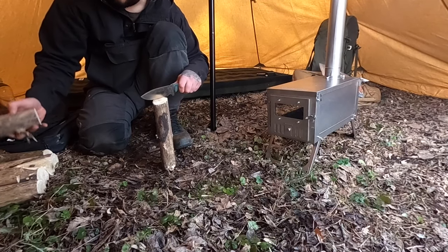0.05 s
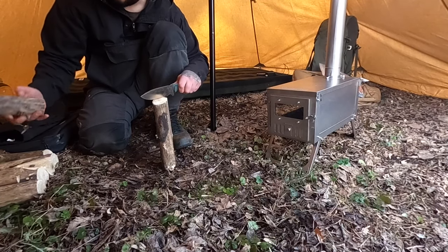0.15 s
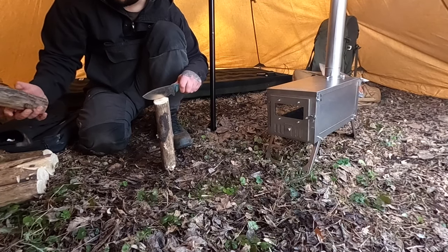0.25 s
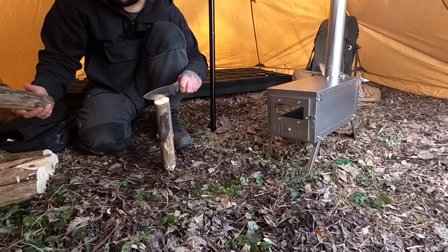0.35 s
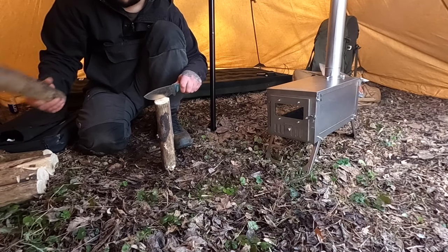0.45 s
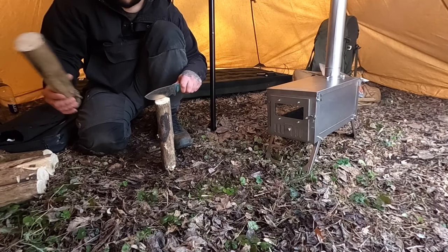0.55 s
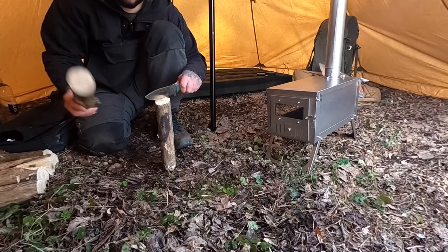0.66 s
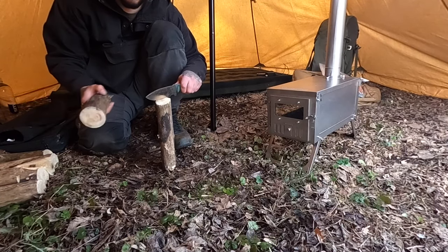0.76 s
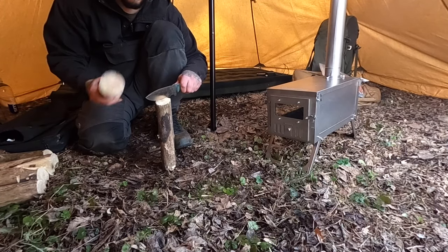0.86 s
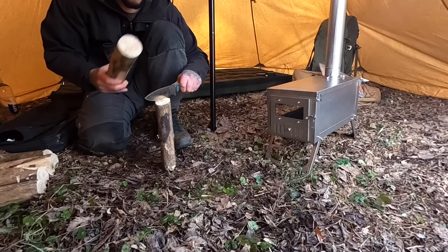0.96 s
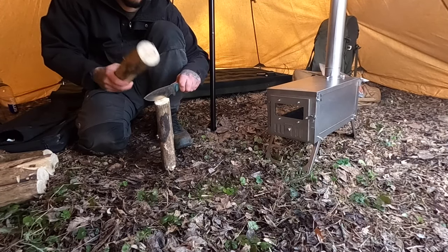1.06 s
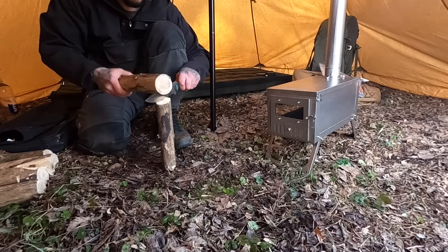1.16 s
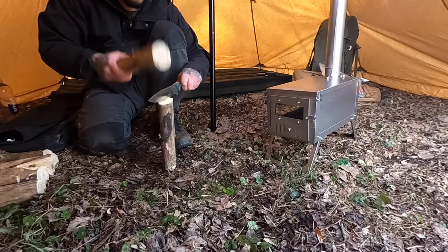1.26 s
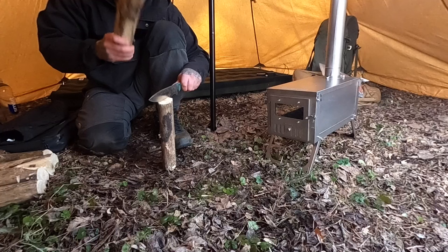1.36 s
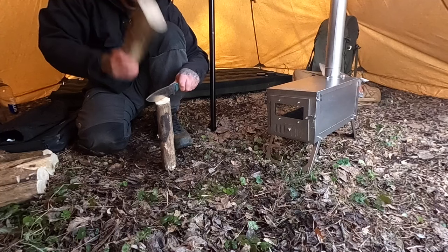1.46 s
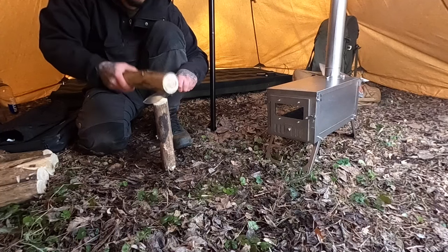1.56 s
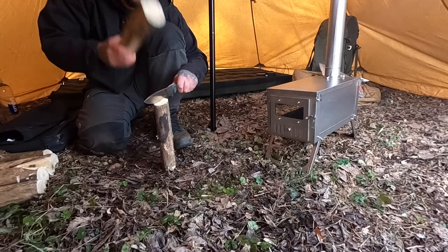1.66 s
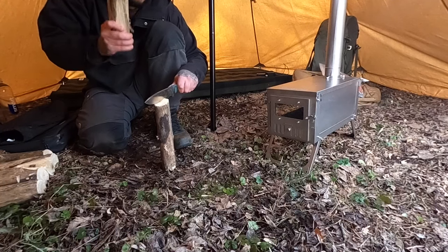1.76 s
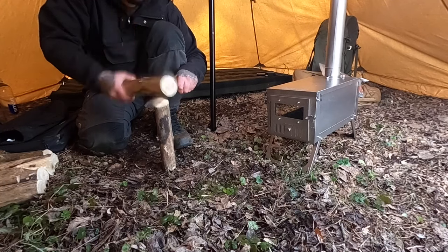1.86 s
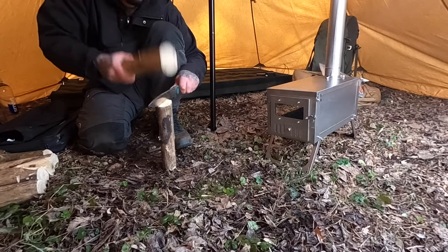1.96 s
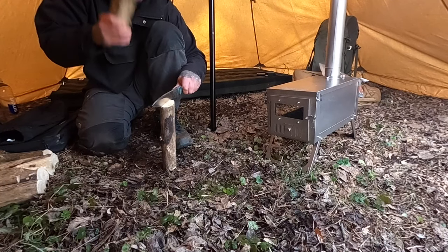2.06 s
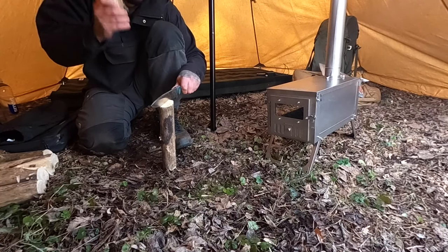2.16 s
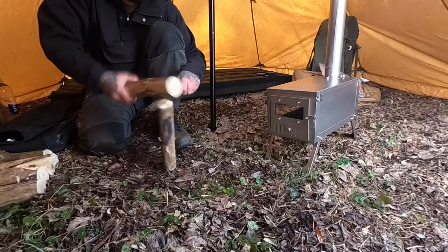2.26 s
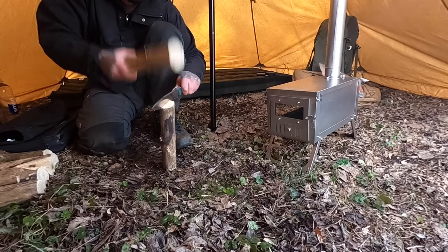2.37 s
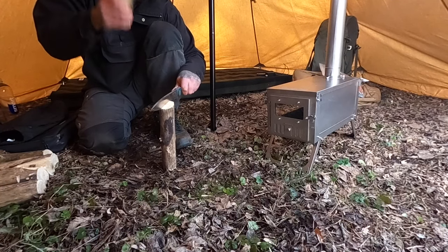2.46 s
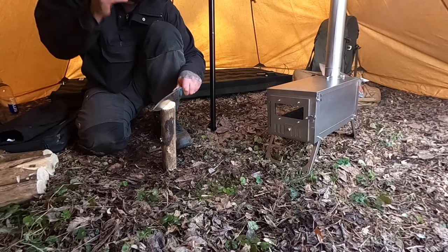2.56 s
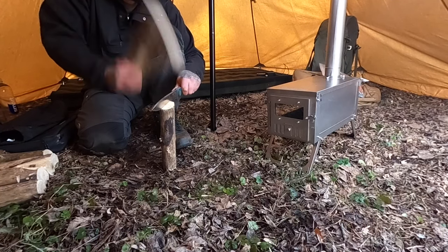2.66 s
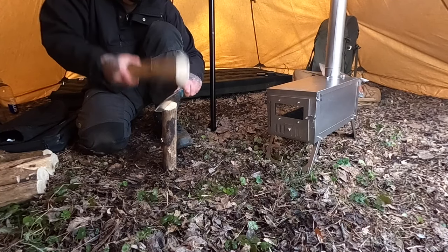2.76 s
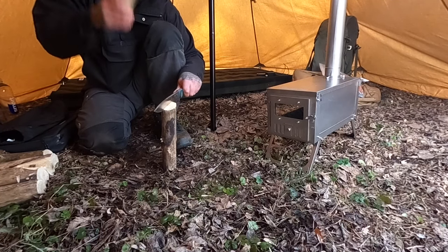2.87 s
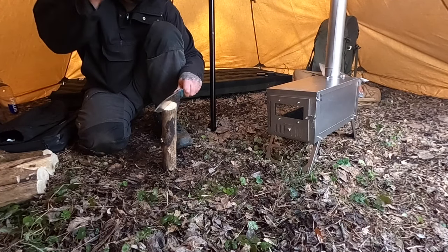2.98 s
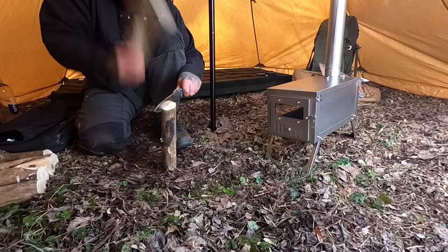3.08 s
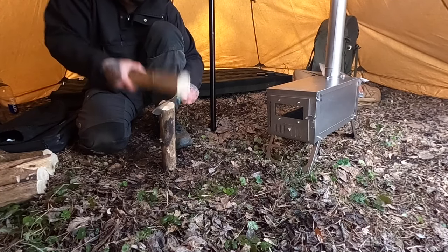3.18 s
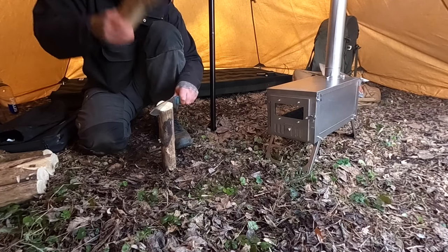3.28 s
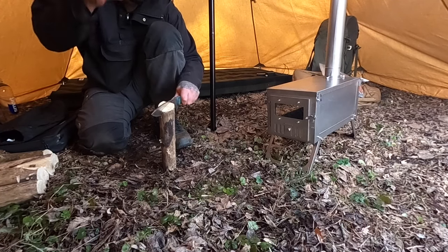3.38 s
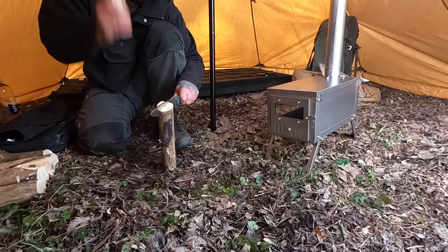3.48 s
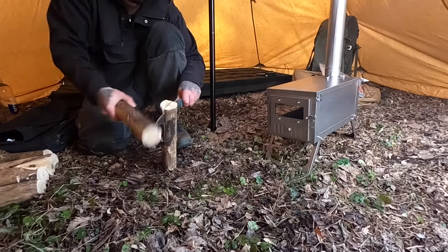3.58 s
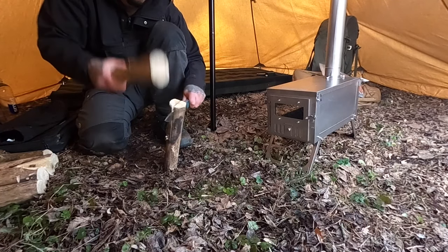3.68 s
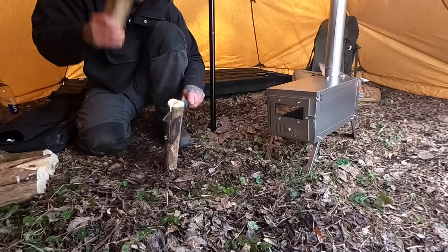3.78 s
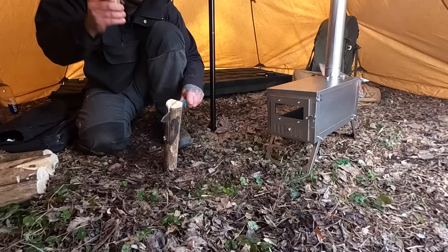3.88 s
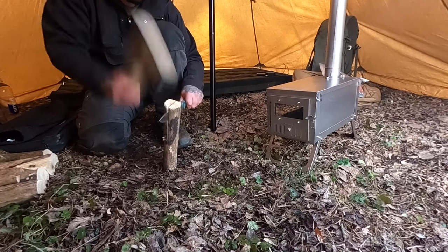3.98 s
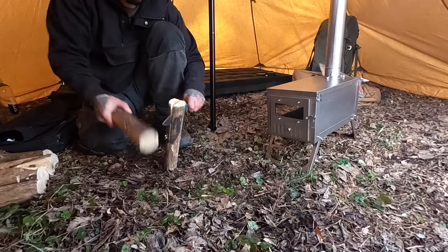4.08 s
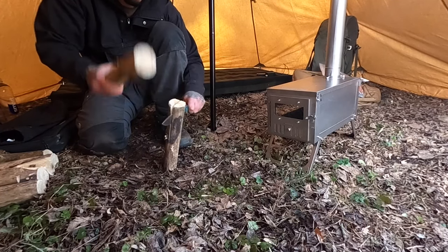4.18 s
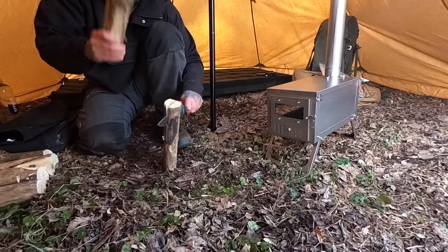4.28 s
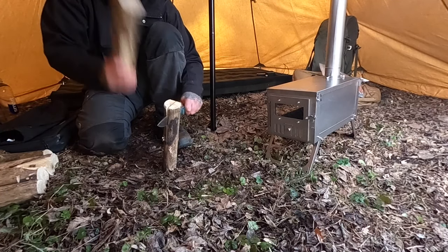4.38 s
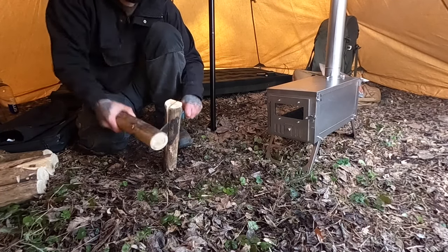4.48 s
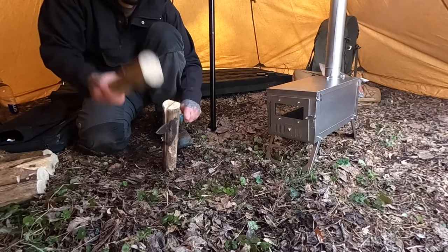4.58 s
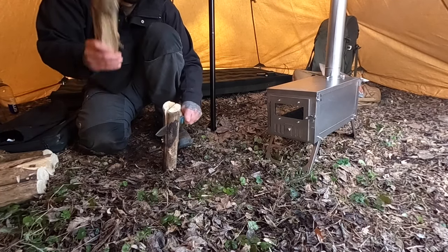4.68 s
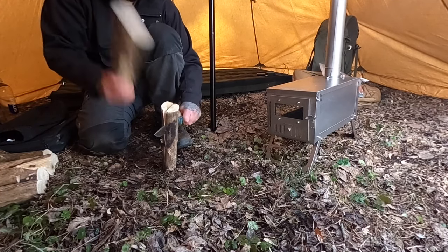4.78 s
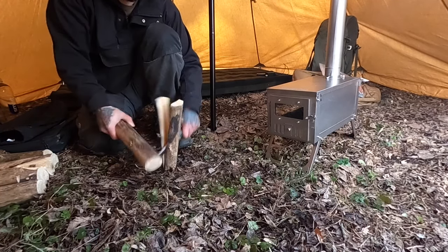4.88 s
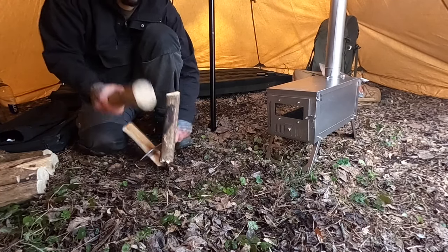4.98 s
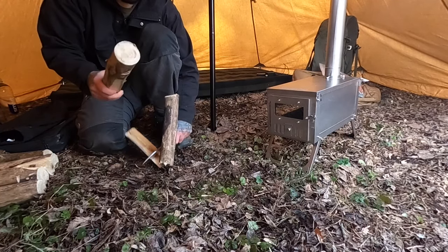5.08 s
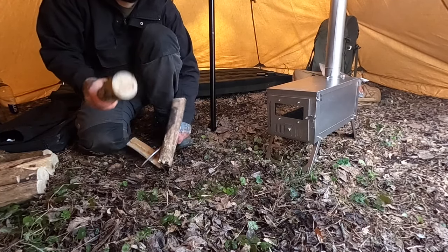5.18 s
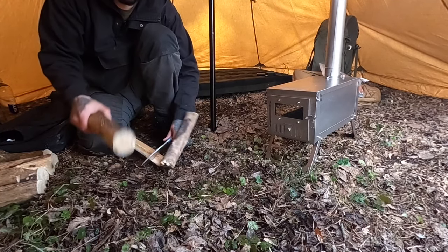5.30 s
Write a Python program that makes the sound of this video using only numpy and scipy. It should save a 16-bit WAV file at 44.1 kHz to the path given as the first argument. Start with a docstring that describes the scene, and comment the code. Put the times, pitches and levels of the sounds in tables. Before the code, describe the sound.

Close stereo microphones in a canvas tent on leafy ground. Very faint blade scrapes and ticks on wood come first, then a softer knock and nine loud, dry baton blows on a knife in a log, about 0.4 seconds apart. At the last blow the wood fibres crackle apart and a half falls into dead leaves. A low steady rumble lies beneath.

```python
"""In a tent on the forest floor, a wooden baton drives a knife down through a small log: ten dry knocks.
Each blow is one crushed push, filtered by modes of wood, blade and ground; shaped noise adds canvas and trees.
After the last blow fibres tear as noisy snaps, and one half topples, crunching clustered clicks into dead leaves.
Earlier the edge scrapes, ticks and squeaks; a jacket swishes; a low rumble and a far hush lie under everything."""
import sys
import numpy as np
from scipy import signal
from scipy.fft import rfft, irfft, dct, next_fast_len
from scipy.io import wavfile
from scipy.ndimage import map_coordinates

SR = 44100
rng = np.random.default_rng(int(sys.argv[2]) if len(sys.argv) > 2 else 0)


def store_pcm(level_fs):
    """Save levels as 16-bit WAV."""
    pcm = np.round(np.clip(level_fs, -1, 1) * 32767).astype(np.int16)
    wavfile.write(sys.argv[1], SR, np.atleast_2d(pcm).T)


N = 235610
RING = np.arange(SR // 4) / SR  # time axis of one short sound [s]

# Background, before the bed trims: (time [s], rumble level [dB], far hush level [dB])
BED_LEVELS = [(0.1, -34.5, -56), (1.24, -39.5, -62), (1.84, -38.5, -60.5), (2.07, -41.5, -61),
              (3.08, -39.5, -62), (4.36, -39, -62.5), (4.46, -36.5, -60.5), (5.3, -39, -60.5)]
# Relative spectra of the low rumble and the far hush: (frequency [Hz], level [dB])
RUMBLE_SPECTRUM = [(21, -31.5), (36, -8.5), (70, -1.5), (86, 2.5), (98, -10), (124, -7.5), (157, -9.5),
                   (276, -29.5), (344, -36.5), (377, -52), (400, -41), (520, -70.5), (880, -120)]
HUSH_SPECTRUM = [(200, 1), (450, -5), (650, -6), (950, -0.5), (1400, -3.5), (2000, -13), (2800, -28),
                 (5000, -29.5), (8000, -39.5), (11000, -53)]
# A narrow drone swells out of the rumble: middle of the swell [s], time constant [s], level reached [dB]
DRONE_S, DRONE_SWELL_S, DRONE_DB = 3.64, 0.18, -39

# The edge shifts on the end grain while the blow is lined up: (time [s], length [s], level [dB])
SCRAPES = [(.22, 0.12, -75), (.41, 0.06, -75.5), (.49, 0.091, -77), (.63, 0.035, -85), (.735, 0.056, -71.5)]
# Light touches of the blade on the log: (time [s], starting level [dB])
TOUCHES = [(0.25, -64.5), (0.455, -63), (.777, -66)]
# Relative spectrum of the edge on wood: (frequency [Hz], level [dB])
EDGE_SPECTRUM = [(1500, -3.5), (3600, -2.5), (4200, 3.5), (4800, -4.5), (6500, -5), (8000, -14),
                 (11000, -16), (15000, -34)]
# The steel squeaks faintly in the end grain: (time [s], half length [s], frequency [Hz], level [dB])
SQUEAKS = [(0.31, 0.013, 4100, -71), (0.58, 0.019, 2100, -69), (0.629, 0.011, 2055, -57)]

# Baton blows, the last row being the baton following through; levels are before the knock trim:
# (time [s], level [dB], ground thud lift [dB], hardness [dB per octave], favoured region [Hz], its lift [dB],
#  weight [dB], wood ring lift [dB], crack [dB], blade frequency [Hz], blade ring [dB])
BLOWS = [(1.207, -14, -14, -1.5, 360.0, 8, -3, 2.5, -2.0, 4140, 2),
         (1.5812, -1.5, -12.5, -1.0, 1130.0, 5, -5.5, -1, 2.0, 4240, 9),
         (1.9386, -1.5, -1.5, -1.5, 1200.0, 9, -10.5, -1, 2.0, 4180, 14.5),
         (2.3381, -0.5, 1, 0.0, 1350.0, 4, 1.5, 2, -1.5, 5340, 14),
         (2.7581, -2, -2, -2, 1300.0, 3, 0.5, 2.5, 16.5, 5220, 6),
         (3.1848, -1, -2.5, -1, 370.0, 4, 3.5, 2.5, 5, 4280, -2),
         (3.6258, -1.5, -6.5, -1.5, 1580.0, 6, 7.5, -1, 6.5, 4290, 5.5),
         (4.0815, -4, 12.5, 4, 2110.0, 3.5, 2.5, 2.5, -14.5, 4350.0, 4.5),
         (4.5061, -1, -1.5, 2, 1330.0, 1, 9.5, 2, -10.5, 5240, 2.5),
         (4.8941, -3.5, 11, 1.0, 1380.0, 8, -8, -4.5, 1.5, 5840, 3.0),
         (4.9179, -9.5, 4, 1.0, 940.0, 5, 5, 3.5, -7.5, 4340, 5)]
# Bare contact before any resonance: (frequency [Hz], level [dB])
CONTACT_SPECTRUM = [(15, -21.5), (40.0, 30.5), (130.0, 20.5), (330.0, 24), (560.0, 21.5), (900.0, 17.5),
                    (1450.0, 20.0), (2100.0, 13.5), (2850.0, 2.5), (4000.0, 1.5), (5800.0, 2.0),
                    (8000.0, -7), (10500.0, -13.0), (13000.0, -26.5), (15500.0, -39)]
# Modes of log and baton, of the soft ground, and a second one of the blade. Before each blow's lifts and
# slight detuning and the cap on cycles: (frequency [Hz], height over the contact curve [dB], t60 [s])
WOOD_MODES = [(444, 2.5, 0.026), (688.4, 6.5, 0.032), (780.6, 7.5, 0.04), (1003, 0.5, 0.024),
              (1230, 0.5, 0.025), (1704, 0.5, 0.099)]
GROUND_MODES = [(61, 5.0, 0.15), (147, 14.5, 0.073)]
UPPER_BLADE_MODE = (10000, 1, 0.0067)
BLADE_T60 = 0.021  # main blade mode before the cap on cycles [s]
RING_CYCLES = 62  # gripped by hand and log, nothing in a knock rings for more cycles than this
# Where the baton lands favours a region of the wood: half width [octaves]; centre of the knock's weight [Hz]
HUMP_OCTAVES, WEIGHT_HZ = 0.22, 234
PIVOT_HZ = 910  # a harder blow gains above this pitch and loses below it
CRACK_HZ = 5000  # the crack is the treble above this
LEAD_S = 0.01  # a faint copy runs this far ahead of each knock [s]
# Scatter from canvas, stove and ground: (frequency [Hz], level against the direct knock [dB])
SCATTER = [(150, -16.5), (600, -8), (1100, -5), (2100, -2.5), (4000, -3.5), (8000, -11.5)]
# Answer of the trees: (frequency [Hz], relative level [dB]) and (frequency [Hz], t60 [s])
TREES_SPECTRUM = [(100, 8), (400, -5), (1000, 1), (1700, -10), (2800, -24.5), (4200, -24.5), (7000, -28.5),
                  (14000, -50.5)]
TREES_T60 = [(200, 0.52), (1000, 0.51), (4000, 0.38), (12000, 0.17)]

# Jacket sleeve: (time [s], length [s], level [dB])
SWISHES = [(3.998, 0.01, -54.5), (4.05, 0.078, -58.5), (4.54, 0.044, -60.5)]
# Relative spectrum of cloth on cloth: (frequency [Hz], level [dB])
CLOTH_SPECTRUM = [(500, -26), (1000, 4.5), (1600, 4), (2800, -15.5), (4300, -7), (7000, -19),
                  (10500, -17.5), (15000, -41.5)]

# Fibres snapping: (time [s], level [dB])
SNAPS = [(4.346, -60.5), (4.9372, -29.5), (4.952, -37.5), (4.962, -37.5), (4.975, -37), (4.9978, -41.5)]
# Relative spectrum of breaking fibres: (frequency [Hz], level [dB])
SPLINTER_SPECTRUM = [(200, 3), (700, -1.5), (1600, 4.5), (2600, -4.5), (4200, -1.5), (7000, -14.5),
                     (10500, -23), (15000, -39)]
# Loose half, before its random spread: (frequency [Hz], relative strength [dB], t60 [s])
LOOSE_HALF_MODES = [(1330, 16, 0.042), (1707, 12.5, 0.029), (1754, 17, 0.077), (2540, 6.5, 0.027),
                    (3670, -3, 0.03)]
# Dead leaves crushed by the falling wood: (time [s], length [s], level [dB])
LITTER = [(5.115, 0.026, -63.5), (5.19, 0.042, -48.5), (5.338, .02, -59)]
# Relative spectrum of crushed leaves: (frequency [Hz], level [dB])
LEAVES_SPECTRUM = [(300, -20), (900, -1.5), (1700, 5.5), (2800, -3.5), (4300, -5.5), (6500, -22.5),
                   (11000, -35.5), (15000, -54)]
# The split half strikes the ground and settles: (time [s], level [dB])
LANDINGS = [(5.0594, -33), (5.1636, -48.5), (5.1899, -42.5), (5.21, -49), (5.2228, -44), (5.232, -47)]

# Diffuse sound: (frequency [Hz], left-right likeness [0 to 1])
LIKENESS = [(330, 1), (700, .995), (1300, .92), (2400, .76), (4400, .43), (8000, .35)]
# Knocks at the two microphones: (frequency [Hz], left minus right [dB])
# and (frequency [Hz], phase by which left leads [rad])
LEVEL_LEAN = [(1050, 0), (1650, .7), (2100, 3.2), (3300, 2.6), (4200, .8), (7000, -.5), (8500, .7),
              (11500, -1)]
PHASE_LEAD = [(1000, 0), (3000, -.1), (3600, -.42), (4300, -.08), (6000, .12), (8200, .38), (9700, -.2),
              (13000, 0)]
TOP_HZ = 15600  # band limit of the recorder


def amp(db):
    """Decibels to gain."""
    return 10 ** (np.asarray(db) / 20)


def unit(x):
    """Scale to rms 1."""
    return x / np.sqrt(np.mean(x ** 2) + 1e-20)


def packet(x):
    """Scale to energy 1 per channel."""
    return unit(x) / np.sqrt(x.shape[-1])


def along(points, hz):
    """Read (frequency, value) points on a log axis."""
    f, v = np.transpose(points)
    return np.interp(np.log(hz + 1), np.log(f + 1), v)


def curves(rows):
    """One value per sample for each column after the time."""
    s, *cols = np.transpose(rows)
    return [np.interp(np.arange(N) / SR, s, c) for c in cols]


def add(track, s, sound):
    """Mix a sound into the track at time s."""
    part = track[:, round(s * SR):][:, :sound.shape[-1]]
    part += sound[..., :part.shape[1]]


def colour(x, points):
    """Causal minimum-phase filter with the gain of (Hz, dB) points, built by folding the cepstrum."""
    n = x.shape[-1]
    m = 2 * next_fast_len(n // 2 + 4096)
    log_gain = np.log(amp(along(points, np.fft.rfftfreq(m, 1 / SR))))
    cepstrum = irfft(log_gain)
    cepstrum[1:m // 2] *= 2
    cepstrum[m // 2 + 1:] = 0
    response = np.exp(rfft(cepstrum))
    return irfft(rfft(x, m) * response, m)[..., :n]


def stereo(pair):
    """Two unrelated signals as diffuse sound at close microphones: alike in the bass, apart in the treble."""
    n = pair.shape[-1]
    likeness = along(LIKENESS, np.fft.rfftfreq(n, 1 / SR))
    turn = np.arccos(np.clip(likeness, -1, 1)) / 2
    mid, side = irfft(rfft(pair) * [np.cos(turn), np.sin(turn)], n)
    return np.array([mid + side, mid - side])


def rush(spectrum):
    """Diffuse noise of rms 1."""
    return unit(colour(stereo(rng.standard_normal((2, N))), spectrum))


def crackle(size, spread_db, width, apart_hz=2400):
    """Dense tiny clicks of very uneven size; the two microphones differ only in the treble."""
    sizes_db = spread_db * np.clip(rng.standard_normal(size), -2, 2)
    clicks = unit(rng.standard_normal(size) * amp(sizes_db))
    treble = signal.butter(3, apart_hz, "high", fs=SR, output="sos")
    side = width * signal.sosfilt(treble, rng.standard_normal(size))
    return np.array([clicks + side, clicks - side])


def clumps(size, depth_db, per_s=330):
    """A jagged gain that gathers tiny clicks into bunches."""
    knots = np.clip(rng.standard_normal(size), -2, 2)
    jagged = np.interp(np.arange(size) * per_s / SR, np.arange(size), knots)
    return unit(amp(depth_db * jagged))


def strokes(rows, attack_s, release_s):
    """Gain of rubbing movements: each rises by 60 dB in attack_s, holds for its length, falls 60 dB in release_s."""
    t = np.arange(N) / SR
    gain = np.zeros(N)
    for s, length, db in rows:
        away = np.maximum((s - t) / attack_s, (t - s - length) / release_s)
        gain += amp(db - 60 * np.maximum(0, away))
    return gain


def outdoors(rumble_trim_db=1.34, hush_trim_db=2.0, drone_hz=83):
    """A low rumble, an unsteady drone and a soft hush, like far traffic, all from diffuse filtered noise."""
    rumble_db, hush_db = curves(BED_LEVELS)
    rumble = amp(rumble_db + rumble_trim_db) * rush(RUMBLE_SPECTRUM)
    drone = rush([(drone_hz * 0.75, -45), (drone_hz, 0), (drone_hz * 1.3, -45), (600, -120)])
    swell = (1 + np.tanh((np.arange(N) / SR - DRONE_S) / DRONE_SWELL_S)) / 2
    hush = amp(hush_db + hush_trim_db) * rush(HUSH_SPECTRUM)
    return rumble + amp(DRONE_DB) * swell * drone + hush


def scrapes():
    """The edge drags over the end grain: bunched grit under slow strokes."""
    grit = crackle(size=N, spread_db=6.0, width=0.8) * clumps(size=N, depth_db=3.5, per_s=120)
    return strokes(SCRAPES, attack_s=0.1, release_s=0.16) * unit(colour(grit, EDGE_SPECTRUM))


def touches(t60=0.025):
    """The blade ticks lightly on the log: short decaying bursts of edge-coloured noise."""
    out = np.zeros((2, N))
    for s, db in TOUCHES:
        burst = unit(colour(rng.standard_normal(len(RING)), EDGE_SPECTRUM))
        add(out, s, amp(db - 60 * RING / t60) * burst)
    return out


def squeaks():
    """Short thin tones as the edge sticks and slips on the wood."""
    t = np.arange(N) / SR
    out = np.zeros(N)
    for s, half_length, hz, db in SQUEAKS:
        bell = np.exp(-((t - s) / half_length) ** 2)
        out += amp(db) * bell * np.sin(2 * np.pi * hz * t)
    return out


def contact(spread_s=0.0042, grain_hz=620, sink_s=0.0019, sink_hz=170):
    """One push with an even spectrum, drawn out as the edge crushes fibres; the soil takes the bass a moment later."""
    hz = np.fft.rfftfreq(len(RING), 1 / SR)
    crush = np.interp(hz / grain_hz, np.arange(64), rng.uniform(0.08, 1, 64))
    delay = spread_s * crush + sink_s / (1 + (hz / sink_hz) ** 4)
    # summing the delay over frequency gives the phase
    push = irfft(np.exp(-2j * np.pi * np.cumsum(delay) * hz[1]), len(RING))
    return push * np.exp(-(RING / 0.03) ** 4)


def resonances(table, lift_db, hz):
    """Power added by modes: the longer one rings, the narrower its peak; each blow detunes them a little."""
    centre, db, t60 = np.transpose(table)
    centre = centre * (1 + 0.012 * rng.uniform(-1, 1, len(centre)))
    t60 = np.minimum(t60, RING_CYCLES / centre)
    off_centre = (hz[:, None] - centre) * t60 * 2 * np.pi / np.log(1000)
    return np.sum(amp(db + lift_db) ** 2 / (1 + off_centre ** 2), axis=1)


def overtones(hz, depth_db=3.5, spacing_hz=150, above_hz=1100):
    """Colour in dB of the many short upper modes of log and knife; each blow meets other ones."""
    peaks = np.clip(rng.standard_normal(400), -1.6, 1.6)
    bumps = map_coordinates(peaks, [hz / spacing_hz], mode="nearest")
    return depth_db * bumps / (1 + (above_hz / hz) ** 4)


def hump(hz, centre):
    """A rounded peak of height 1 on the octave axis."""
    return 1 / (1 + (np.log2(hz / centre) / HUMP_OCTAVES) ** 2)


def tone(ground_db, hardness, favoured_hz, favoured_db, weight_db, wood_db, crack_db, blade_hz, ring_db):
    """(Hz, dB) response to one blow: the shaded contact, with modes of wood, ground and blade standing out of it."""
    hz = np.geomspace(10, SR / 2, 1200)
    tilt = hardness * np.log2(np.maximum(hz, 100) / PIVOT_HZ)
    landing = favoured_db * hump(hz, favoured_hz) + weight_db * hump(hz, WEIGHT_HZ)
    crack = crack_db / (1 + (CRACK_HZ / hz) ** 4)
    blade = [(blade_hz, ring_db, BLADE_T60), UPPER_BLADE_MODE]
    power = 0.5 + resonances(WOOD_MODES, wood_db, hz)  # 0.5 is the share of the bare contact
    power = power + resonances(GROUND_MODES, ground_db, hz) + resonances(blade, 0, hz)
    shade = tilt + landing + crack
    level = along(CONTACT_SPECTRUM, hz) + shade + 10 * np.log10(power) + overtones(hz)
    return np.column_stack([hz, level])


def canvas(t60=0.069, rise=0.0024, reach=0.071):
    """Uneven reflections inside the tent, fading fast once the farthest wall has answered."""
    build_up = 1 - np.exp(-RING / rise)
    fade = amp(-60 * RING / t60) / np.sqrt(1 + (RING / reach) ** 6)
    echoes = crackle(size=len(RING), spread_db=8, width=0.18) * clumps(size=len(RING), depth_db=4.0)
    return colour(packet(echoes * build_up * fade), SCATTER)


def trees():
    """A faint long answer from the wood outside: diffuse noise whose treble dies first."""
    hz, t, z = signal.stft(stereo(rng.standard_normal((2, SR))), SR, nperseg=256)
    fade = amp(-60 * t / along(TREES_T60, hz)[:, None])
    tail = signal.istft(z * fade, SR, nperseg=256)[1]
    return packet(colour(tail, TREES_SPECTRUM))


def placed(pair):
    """Level and phase differences between the microphones for sound from the log."""
    m = next_fast_len(N + SR // 2)
    hz = np.fft.rfftfreq(m, 1 / SR)
    half = amp(along(LEVEL_LEAN, hz) / 2) * np.exp(1j * along(PHASE_LEAD, hz) / 2)
    return irfft(rfft(pair, m) * [half, 1 / half], m)[:, :N]


def knocks(knock_trim_db=1.0, trees_db=-8, tick_db=-24):
    """Each blow rings wood, blade and ground; its colour shifts as the knife sinks and the split opens."""
    out = np.zeros((2, N))
    for s, db, *shading in BLOWS:
        knock = amp(db + knock_trim_db) * colour(contact(), tone(*shading))
        echoes = signal.fftconvolve(knock[None], canvas(), axes=1)[:, :len(RING)]
        heard = knock + echoes
        add(out, s, heard)
        # the blow level counts twice in the tick ahead, so it favours hard blows
        add(out, s - LEAD_S, amp(db + tick_db) * heard)
        add(out, s, amp(db + trees_db) * trees())
    return placed(out)


def sleeve():
    """Cloth rubs on cloth as the arm swings: fine crackle under soft strokes."""
    cloth = colour(crackle(size=N, spread_db=8.0, width=0.61), CLOTH_SPECTRUM)
    return strokes(SWISHES, attack_s=0.081, release_s=0.22) * unit(cloth)


def modes(table, vary_db, detune):
    """Damped modes, struck at new strengths; neighbours start in opposite directions."""
    out = np.zeros(len(RING))
    for k, (hz, db, t60) in enumerate(table):
        size, shift = rng.uniform(-1, 1, 2)
        decay = amp(db + vary_db * size - 60 * RING / t60)
        out += (-1) ** k * decay * np.sin(2 * np.pi * hz * (1 + detune * shift) * RING)
    return packet(out)


def splinter(t60, ring_db, snap, snap_s=0.0024):
    """A sharp snap and a bunch of breaking fibres that also ring the loose half."""
    fibres = crackle(size=len(RING), spread_db=9, width=0.5) * clumps(size=len(RING), depth_db=3)
    shape = amp(-60 * RING / t60) / 2 + snap * np.exp(-RING / snap_s)
    loose_half = modes(LOOSE_HALF_MODES, vary_db=2, detune=0.05)
    return unit(colour(fibres, SPLINTER_SPECTRUM)) * shape + amp(ring_db) * loose_half


def snapping_fibres():
    """Fibres snap one by one in short splintering bursts, a faint one early, the rest after the last blow."""
    out = np.zeros((2, N))
    for s, db in SNAPS:
        add(out, s, amp(db) * splinter(t60=0.11, ring_db=7.5, snap=0.39))
    return out


def crushed_leaves():
    """Dead leaves crunch under the falling wood: very uneven clicks in bunches."""
    leaves = crackle(size=N, spread_db=13, width=0.61) * clumps(size=N, depth_db=7.5)
    return strokes(LITTER, attack_s=0.13, release_s=0.086) * unit(colour(leaves, LEAVES_SPECTRUM))


def landings():
    """The loose half strikes the ground and settles: splintering bursts with more ring and less snap."""
    out = np.zeros((2, N))
    for s, db in LANDINGS:
        add(out, s, amp(db) * splinter(t60=0.097, ring_db=21, snap=0.23))
    return out


def scene():
    """All sources at the microphones."""
    lining_up = scrapes() + touches() + squeaks()
    splitting = snapping_fibres() + crushed_leaves() + landings()
    return outdoors() + lining_up + knocks() + sleeve() + splitting


def record(dry, ceiling=1.0):
    """The recorder rounds the highest peaks and keeps nothing above its band limit."""
    rounded = dry / (1 + (dry / ceiling) ** 6) ** (1 / 6)
    kept = np.arange(N) * SR / (2 * N) < TOP_HZ
    return dct(dct(rounded, norm="ortho") * kept, type=3, norm="ortho")  # type 3 undoes the first transform


dry = scene()
out = record(dry)
store_pcm(out)
```